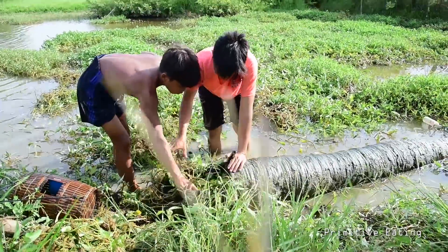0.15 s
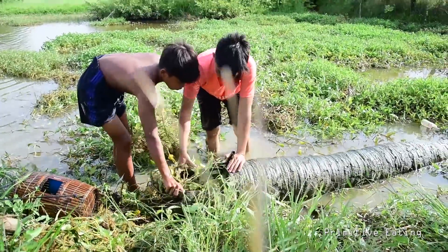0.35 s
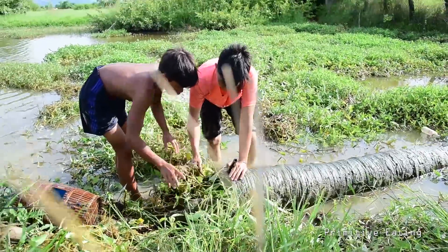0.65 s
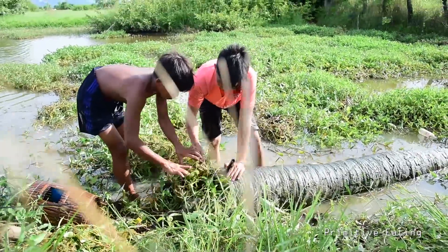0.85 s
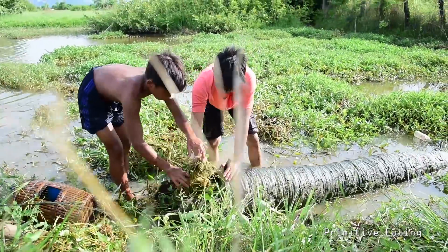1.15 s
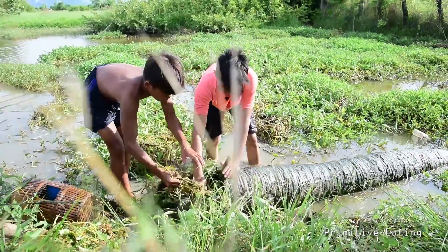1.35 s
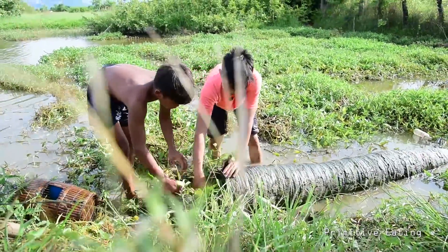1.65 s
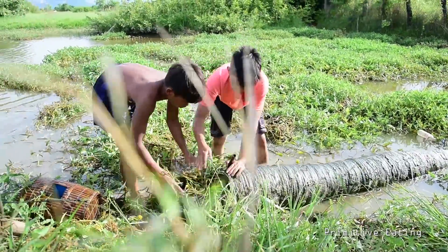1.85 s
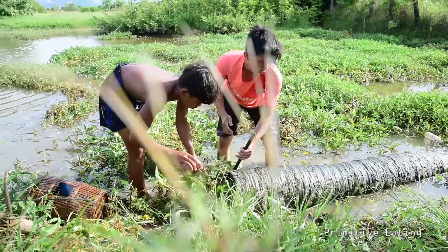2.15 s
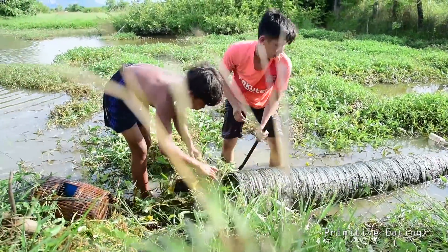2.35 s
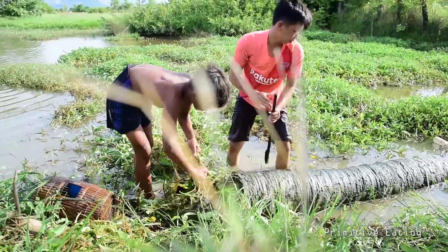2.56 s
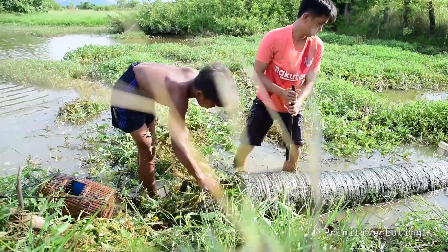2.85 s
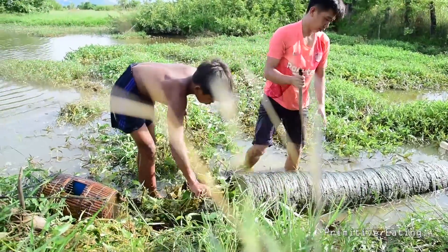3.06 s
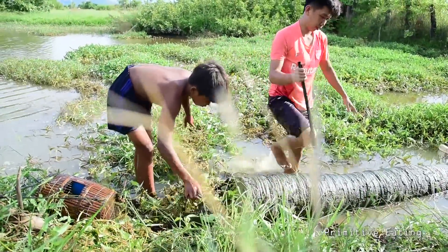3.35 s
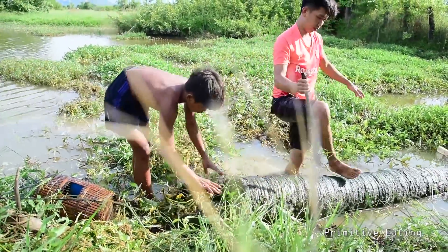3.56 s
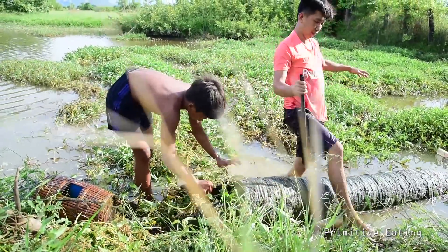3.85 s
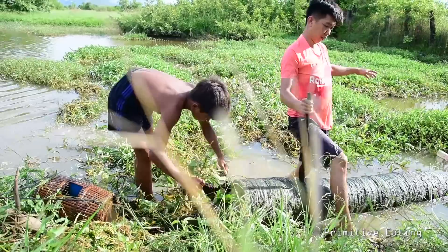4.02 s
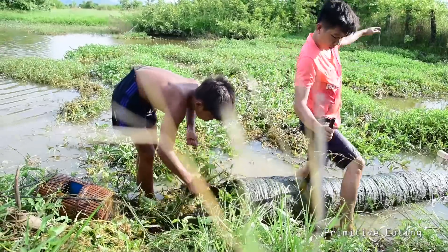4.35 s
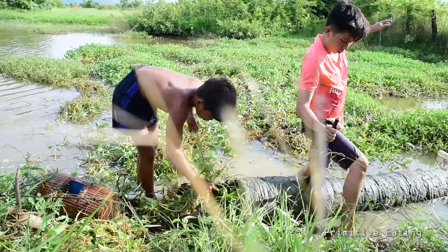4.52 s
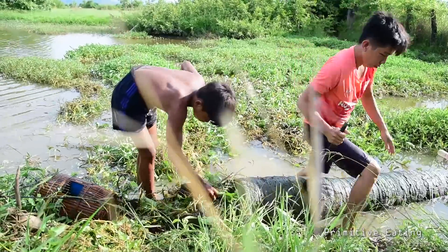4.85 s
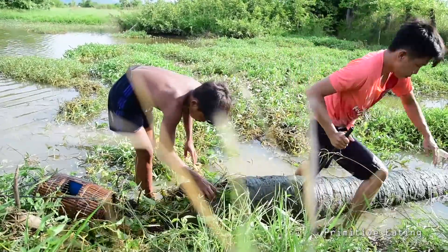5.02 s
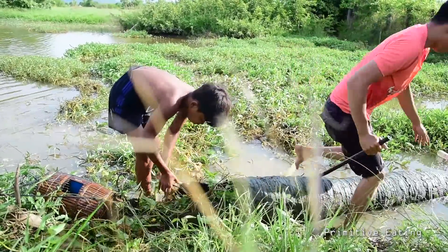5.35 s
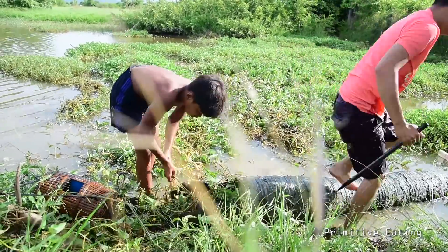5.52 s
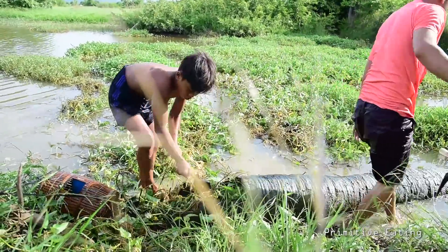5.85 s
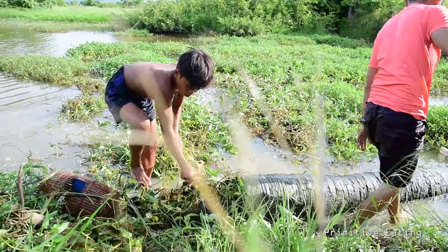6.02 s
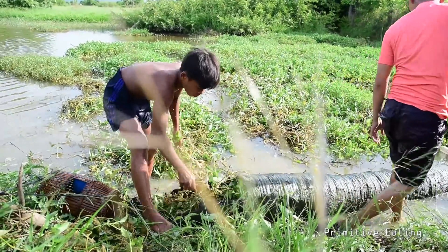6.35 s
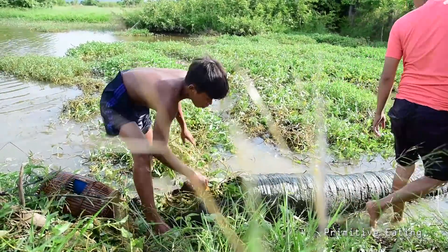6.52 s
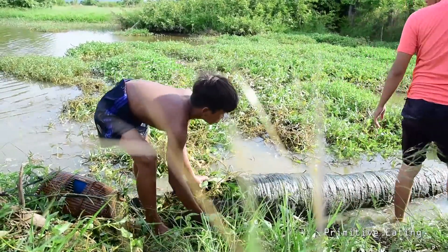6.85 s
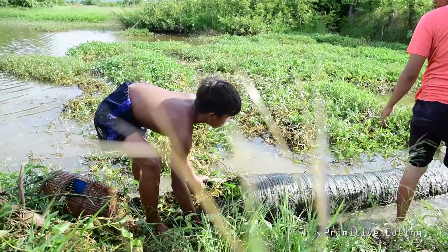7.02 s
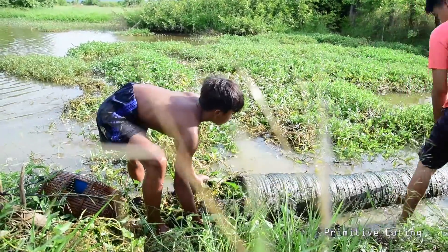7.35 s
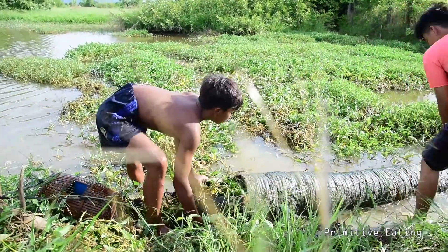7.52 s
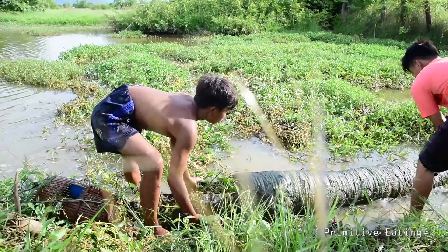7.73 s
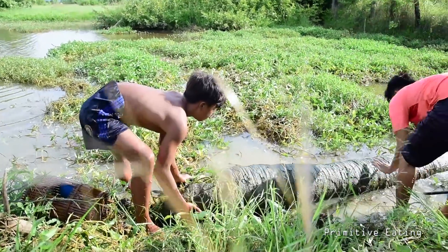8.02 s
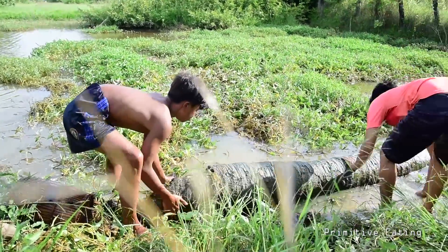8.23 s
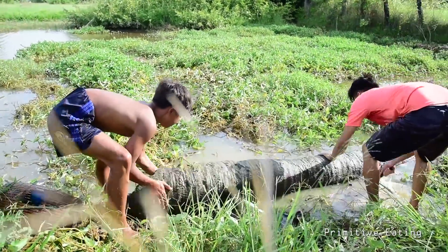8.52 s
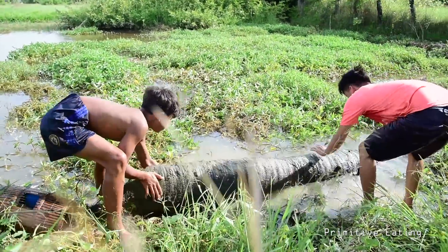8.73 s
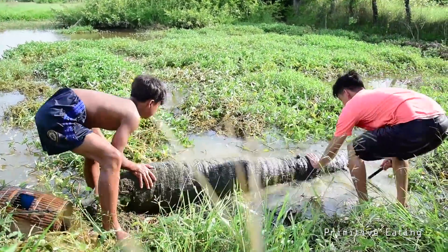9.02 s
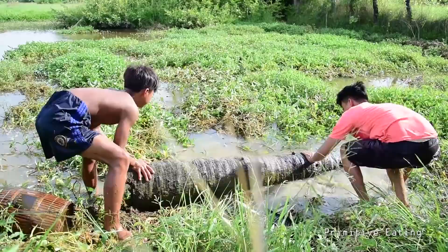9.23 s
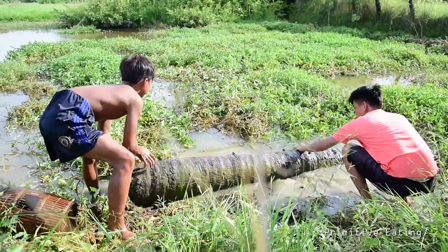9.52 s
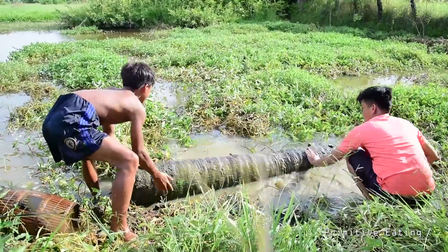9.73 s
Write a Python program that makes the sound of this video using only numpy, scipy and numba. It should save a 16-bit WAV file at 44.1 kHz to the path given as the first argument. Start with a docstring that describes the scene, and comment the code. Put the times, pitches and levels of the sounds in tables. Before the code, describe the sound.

Close outdoor sounds of wet weeds rustling and breaking, hands and legs stirring shallow water, plopping bubbles, then a log dully rumbling and briefly creaking.

```python
"""A shallow muddy pond outdoors: two people clear wet weeds from a log, a few metres from stereo microphones.
Stems snap and tear as shaped noise bursts; bubbles and a knock are damped sines, gulps swelling sines,
squelches upward glides. Slosh and leaf rustle are swarms of small rings; near the end the log rumbles
on the mud and creaks. A low rumble, hiss, drone, insect-like band and thin steady high whine lie underneath."""
import sys
import numpy as np
from scipy import signal
from scipy.fft import rfft, irfft, next_fast_len
from scipy.io import wavfile
from scipy.ndimage import uniform_filter1d, map_coordinates
from numba import njit

SR = 44100
rng = np.random.default_rng(int(sys.argv[2]) if len(sys.argv) > 2 else 0)


def transcribe(u):
    """Save the signal u as a 16-bit wav file named by the first command-line argument.

    u: samples, shape (n,) or (channels, n), limited to [-1, 1]; the rate is SR.
    q: integer samples, one column per channel.
    """
    v = np.clip(np.atleast_2d(u).T, -1, 1)
    q = np.round(v * 32767).astype(np.int16)
    wavfile.write(sys.argv[1], SR, q)


N = 435708
T = np.arange(N) / SR


def undb(db):
    """Decibels to gain."""
    return 10 ** (np.asarray(db) / 20)


def curve(rows):
    """Join (time [s], value) rows by straight lines."""
    return np.interp(T, *np.transpose(rows))


def unit(x):
    """Scale to an rms of 1."""
    return x / np.sqrt(np.mean(x ** 2) + 1e-20)


def band(x, lo_hz, hi_hz, order=2):
    """Causal Butterworth band-pass."""
    edges_hz = [lo_hz, min(hi_hz, SR / 2 - 1)]
    return signal.sosfilt(signal.butter(order, edges_hz, "band", fs=SR, output="sos"), x)


def colour(x, points):
    """Shape a spectrum by (frequency [Hz], gain [dB]) points, joined on a log frequency axis."""
    size = next_fast_len(N)
    hz, db = np.transpose(points)
    bins_hz = np.maximum(np.arange(size // 2 + 1) * SR / size, 1)
    gain = undb(np.interp(np.log(bins_hz), np.log(hz), db))
    return irfft(rfft(x, size) * gain, size)[..., :N]


def walk(rate_hz):
    """Random values, rate_hz new ones per second, joined by straight lines; spread near 1."""
    return np.interp(T * rate_hz, np.arange(N // 20), rng.standard_normal(N // 20))


def pair(size, likeness):
    """Left and right noise that are partly alike."""
    mid, side = rng.standard_normal((2, size))
    c = np.clip(likeness, 0, 1)
    return np.sqrt((1 + c) / 2) * mid + np.sqrt((1 - c) / 2) * np.array([side, -side])


def panned(x, pan_db):
    """Tip a sound left (positive) or right at constant power."""
    return x * unit(undb(np.array([[pan_db], [-pan_db]]) / 2))


def add(out, s, x):
    """Mix x into out from time s."""
    i = max(int(s * SR), 0)
    out[:, i:i + x.shape[-1]] += x[..., :max(N - i, 0)]


def efforts(rows, attack_s, release_s, rest_db=-100):
    """Level in dB of movements (time, length, level): each builds up, holds, dies away; powers add."""
    power = np.full(N, undb(rest_db) ** 2)
    for s, length_s, db in rows:
        t = T[:int((length_s + 8 * release_s) * SR)]
        envelope = np.minimum(t / attack_s, 1) * np.exp(-np.maximum(t - length_s, 0) / release_s)
        add(power[None], s, (undb(db) * envelope) ** 2)
    return 10 * np.log10(power)


@njit
def rings(size, start_s, hz, t60_s, gain, rise):
    """Damped sines whose pitch climbs by the share rise while they die away."""
    out = np.zeros(size)
    for k in range(len(start_s)):
        first, count, phase = int(start_s[k] * SR), int(t60_s[k] * SR) + 2, 0.
        for i in range(max(0, min(count, size - first))):
            phase += 2 * np.pi * hz[k] * (1 + rise * i / count) / SR
            onset = 1 - np.exp(-phase / 3)
            out[first + i] += gain[k] * np.sin(phase) * onset * 1000. ** (-i / count)
    return out


def cloud(count, lo_hz, hi_hz, cycles, spread_db, rise, points, even_s):
    """Swarm of small unequal rings spread left to right, held near a running rms of 1 over even_s."""
    when, pitch, life, size, place = rng.random((count, 5)).T
    hz = lo_hz * (hi_hz / lo_hz) ** pitch
    gain = undb(-spread_db * np.log(np.maximum(size, .004))) * np.sqrt(hz)
    t60_s = cycles * (.5 + life) / hz
    sides = [rings(N, when * N / SR, hz, t60_s, gain * (.5 + p), float(rise)) for p in (place, 1 - place)]
    x = colour(np.array(sides), points)
    power = uniform_filter1d(np.mean(x ** 2, axis=0), int(even_s * SR))
    return x / np.sqrt(np.abs(power) + 1e-12)


# still air over the pond: (frequency [Hz], relative density [dB])
AIR_COLOUR = [(100, -42), (400, -10), (650, -12.5), (1200, -5), (2000, -10), (3000, -9.5), (4400, -13),
              (7500, -10.5), (10500, -12.5), (13000, -16.5), (15000, -20.5)]
# hiss: (time [s], level [dB])
HISS_LEVEL = [(0, -50), (1.9, -55), (4.8, -53), (5.1, -58), (5.6, -54), (9.88, -54)]
WHINE_HZ = 15719


def air(drone_db=-57, ring_db=-66, whine_db=-65, whine_width_hz=5):
    """Wide hiss, a low drone, a faint insect-like band and a thin steady high whine."""
    mid, side = colour(rng.standard_normal((2, N)), AIR_COLOUR)
    # long waves reach both microphones alike
    side = 1.21 * band(side, 910, 18000, order=1)
    hiss = unit(np.array([mid + side, mid - side])) * undb(curve(HISS_LEVEL) + .5 * walk(2.36))
    drone = unit(band(rng.standard_normal(N), 229.6, 274.7)) * undb(drone_db + 2 * walk(13.0))
    ring = unit(band(pair(N, likeness=.9), 3520, 3980)) * undb(ring_db + 2 * walk(40))
    whine = np.sqrt(2) * np.sin(2 * np.pi * np.cumsum(WHINE_HZ + whine_width_hz * walk(30)) / SR)
    return hiss + drone + ring + undb(whine_db) * whine


# breeze on the microphones: (time [s], level [dB])
BREEZE_LEVEL = [(0.0, -44), (1.2, -44.5), (1.7, -47.5), (3.8, -46), (4.35, -44.5), (4.6, -48), (6.9, -46.5),
                (8.1, -44.5), (8.8, -44)]
# its spectrum: (frequency [Hz], relative level [dB])
BREEZE_SPECTRUM = [(20, -28), (32, -8), (42, 4.5), (65, 2), (100, -3), (160, -6), (260, -8.5), (380, -12),
                   (500, -19), (900, -25), (2000, -46)]


def breeze(flutter_db=0.5):
    """Breeze: a fluttering low rumble of coloured noise, the same on both sides."""
    rumble = unit(colour(rng.standard_normal(N), BREEZE_SPECTRUM))
    return rumble * undb(curve(BREEZE_LEVEL) + flutter_db * walk(12))


# one hard, dry knock: (time [s], level [dB], left minus right [dB])
KNOCK_EVENT = (.5892, -7.5, -7)
# its modes: (frequency [Hz], level re knock [dB], t60 [s])
KNOCK_RING = [(584, -28, 0.0085), (900, -7, 0.0043), (1650, 2.5, 0.0035), (2770, 5, 0.0024),
              (3030, -4, 0.0054), (6080, 3, 0.0039), (7700, -1, 0.0016), (9600, -25, .002)]


def knock():
    """A hard blow excites damped modes that die away within a few milliseconds."""
    s, db, pan_db = KNOCK_EVENT
    hz, mode_db, t60_s = np.array(KNOCK_RING, float).T.copy()
    ring = rings(N, np.full(len(hz), s), hz, t60_s, undb(db + mode_db), 0.)
    return panned(ring, pan_db)


# shoves that shift the log on the mud: (time [s], length [s], level [dB])
LOG_SHOVES = [(8.77, 0.21, -46), (8.95, 0.059, -38), (9.39, 0.32, -37.5), (9.49, 0.086, -29.5),
              (9.81, .07, -40)]
SHOVE_ATTACK_S, SHOVE_RELEASE_S = 0.023, 0.019
# creak as the log turns: (time [s], length [s], slips [1/s], pitch [Hz], level [dB])
LOG_CREAK = (9.444, .12, 76, 1750, -49)


def log():
    """The heavy trunk bumps dully over the mud; its bark sticks and slips in a short creak."""
    bumps = cloud(count=2200, lo_hz=55.3, hi_hz=376, cycles=3.2, spread_db=5, rise=0,
                  points=[(30, 3), (80, 4.5), (150, 2.5), (300, -6.5), (500, -24), (1200, -40)],
                  even_s=0.044)
    shove_gain = undb(efforts(LOG_SHOVES, SHOVE_ATTACK_S, SHOVE_RELEASE_S))
    out = unit(bumps.mean(axis=0)) * shove_gain * np.ones((2, 1))
    s, length_s, slips_hz, hz, db = LOG_CREAK
    t = T[:int(length_s * SR)]
    slip_envelope = np.exp(-(t * slips_hz % 1) / 0.39 - 2 * t / length_s)
    slips = slip_envelope * pair(t.size, likeness=0.6)
    add(out, s, undb(db) * unit(band(slips, hz / 1.4, hz * 1.21)))
    return out


# air pockets closing behind a hand or foot: (time [s], pitch [Hz], relative level [dB])
GULP_EVENTS = [(0.085, 246, -31), (0.131, 263, -30.5), (0.172, 265, -33), (0.582, 235, -33.5),
               (2.42, 257, -36), (3.009, 262, -28), (3.05, 258, -30), (4.179, 271, -31.5),
               (4.737, 272, -39), (4.77, 286, -36), (4.795, 272, -32), (6.21, 278, -31),
               (7.031, 246, -25.5), (7.064, 318, -34), (8.017, 220, -30), (8.055, 235, -32),
               (8.11, 285, -30.5), (8.419, 253, -33)]
GULP_SWELL_S = 0.0074


def gulps(level_db=-1, stir_db=-11, stir_s=0.018):
    """A hollow in the water closes and throbs for a few deep cycles, while the water around it heaves."""
    out, t, stir = np.zeros((2, N)), T[:SR // 8], np.zeros(N)
    swell = (t / GULP_SWELL_S * np.exp(1 - t / GULP_SWELL_S)) ** 1.44
    for s, hz, db in GULP_EVENTS:
        add(out, s, undb(db + level_db) * swell * np.sin(2 * np.pi * hz * t))
        stir = np.maximum(stir, undb(db) * np.exp(-np.abs(T - s) / stir_s))
    heave = unit(band(rng.standard_normal(N), 173, 356))
    return out + undb(stir_db) * stir * heave


# mud sucking at a narrowing air hole:
# (time [s], length [s], first pitch [Hz], last pitch [Hz], level before flutter [dB])
SQUELCH_EVENTS = [(0.977, 0.031, 817, 2000, -46), (1.532, 0.029, 780, 1040, -48),
                  (1.562, 0.023, 710, 880, -37), (1.584, 0.033, 957, 1460, -37.5),
                  (2.231, 0.024, 1300, 2090, -48.5), (5.513, 0.037, 786, 1407, -39),
                  (6.022, 0.04, 1138, 2260, -43), (9.273, 0.065, 453, 1074, -47.5)]


def squelches(rough_db=3, wobble=0.042, flutter_hz=260):
    """An air hole in the mud shrinks, so its note slides up; the soft rim flutters and breaks the note."""
    out = np.zeros((2, N))
    for s, length_s, first_hz, last_hz, db in SQUELCH_EVENTS:
        u = np.linspace(0, 1, int(length_s * SR))
        knots = rng.standard_normal((2, SR // 1000))
        size, pitch = (np.interp(u * length_s * flutter_hz, np.arange(row.size), row) for row in knots)
        hz = first_hz * (last_hz / first_hz) ** u * np.exp(wobble * pitch)
        phase = 2 * np.pi * np.cumsum(hz) / SR
        envelope = undb(db + rough_db * size) * np.abs(np.sin(np.pi * u)) ** 0.3
        add(out, s, envelope * np.sin(phase))
    return out


# single loud bubbles: (time [s], starting pitch [Hz], relative level [dB])
BUBBLE_EVENTS = [(0.505, 2690, -40), (1.158, 1440, -38.5), (1.399, 3820, -35), (1.428, 3390, -31),
                 (2.952, 2250, -39.5), (3.28, 1291, -36), (3.302, 1030, -34), (3.348, 1500, -27),
                 (3.361, 900, -21), (3.364, 1190, -18), (3.406, 1210, -31), (3.445, 1270, -36),
                 (3.489, 2610, -32), (3.528, 2400, -31), (3.873, 1960, -31.5), (4.037, 1370, -36),
                 (4.177, 1050, -27.5), (4.187, 530, -29), (4.687, 1136, -19), (5.311, 1650, -39.5),
                 (5.37, 1291, -30.5), (5.427, 2000, -35), (5.475, 970, -36), (5.616, 1900, -39),
                 (5.658, 2130, -37.5), (5.886, 1200, -33.5), (5.91, 1254, -24.5), (5.973, 1930, -29.5),
                 (6.119, 2190, -34), (6.153, 1240, -25), (6.534, 1808, -35), (6.636, 1420, -24),
                 (6.643, 2250, -24.5), (6.669, 2300, -24), (6.703, 1710, -31), (6.755, 1370, -23.5),
                 (7.039, 955, -27.5), (7.074, 720, -31.5), (7.684, 930, -33.5), (7.8, 1165, -29),
                 (7.995, 1070, -26), (8.001, 557, -32), (8.02, 544, -33), (8.048, 1010, -33),
                 (8.118, 1270, -39), (8.319, 1200, -37.5), (8.412, 1050, -36), (8.421, 2550, -33.5),
                 (8.483, 1033, -38.5), (8.565, 1110, -38.5), (8.706, 1910, -35.5), (8.834, 1130, -39.5),
                 (9.332, 1690, -36), (9.753, 550, -39), (9.831, 900, -36)]
BUBBLE_T60_S = 0.028


def bubbles(rise=0.18, level_db=3, split_db=-11, split_s=.007, spread=0.195, pan_db=-1.5, count=3):
    """A pocket of air breaks into one large ringing bubble and a few lesser ones of nearby pitch."""
    s, hz, db = np.array(BUBBLE_EVENTS, float).T.copy()
    t60_s = np.full(len(s), BUBBLE_T60_S)
    out = rings(N, s, hz, t60_s, undb(db + level_db), float(rise))
    for _ in range(count):
        delay, pitch, size = rng.standard_normal((len(s), 3)).T
        lesser_s = s + split_s * np.abs(delay)
        lesser_hz = hz * np.exp(spread * pitch)
        out += rings(N, lesser_s, lesser_hz, 0.53 * t60_s, undb(db + split_db + 2 * size), float(rise))
    return panned(out, pan_db)


# a leg or hand sweeps through the water: (time [s], length [s], relative level [dB])
WATER_STROKES = [(0.0, 0.13, -50), (0.48, .12, -56), (0.96, 0.051, -51), (1.11, 0.08, -52.5),
                 (1.36, .27, -59), (2.05, 0.019, -55), (2.76, 0.064, -45), (2.96, 0.14, -50.5),
                 (3.27, .28, -44.5), (3.32, 0.14, -44.5), (3.38, 0.079, -55), (3.58, .2, -55.5),
                 (3.87, 0.21, -53), (4.45, 0.038, -56.5), (4.68, .11, -54), (5.28, 0.024, -50.5),
                 (5.33, 0.2, -45.5), (5.56, 0.076, -49.5), (5.85, 0.13, -43.5), (6.09, 0.14, -50),
                 (6.51, 0.28, -46), (6.6, 0.084, -43), (6.95, 0.25, -51.5), (7.01, 0.021, -38),
                 (7.3, 0.04, -53), (7.4, 0.068, -56), (7.66, 0.18, -53), (7.97, 0.13, -44),
                 (8.18, 0.21, -49.5), (8.39, 0.21, -47), (8.66, .14, -47), (8.82, 0.33, -56.5),
                 (9.14, 0.25, -50.5), (9.62, 0.19, -49), (9.78, 0.11, -45)]
# spectrum of the stirred water: (frequency [Hz], gain [dB])
WATER_COLOUR = [(200, -31), (450, 2), (700, -2), (1150, 4), (1800, 5.5), (2800, 9.5), (4500, 7.5),
                (9000, 28)]
# the water takes a moment to get going, then settles to a gentle lapping
STROKE_ATTACK_S, STROKE_RELEASE_S, LAPPING_REST_DB = 0.017, 0.048, -61.5


def slosh(bubble_db=-4, churn_db=-4.0, gurgle_db=-47, lapping_db=2, surge_db=1.35, pan_db=-1.5,
          gush_db=-7, gush_growth=1.5):
    """Stirred water: little bubbles over a churn of shorter ones; a gush grows faster than the strokes."""
    distinct = cloud(count=3200, lo_hz=750, hi_hz=3200, cycles=32, spread_db=4.2, rise=.24,
                     points=WATER_COLOUR, even_s=.07)
    churn = cloud(count=18000, lo_hz=450, hi_hz=5000, cycles=15, spread_db=3, rise=.18,
                  points=WATER_COLOUR, even_s=.06)
    gush = cloud(count=2600, lo_hz=850, hi_hz=1900, cycles=40, spread_db=3, rise=.2,
                 points=WATER_COLOUR, even_s=.05)
    db = efforts(WATER_STROKES, STROKE_ATTACK_S, STROKE_RELEASE_S, LAPPING_REST_DB)
    db = db + surge_db * walk(22) + lapping_db * walk(110)
    # gentle stirring traps little air, hard stirring shreds it: single bubbles stand out in between
    blend_db = np.minimum(np.abs(db - gurgle_db) / 4, 3) - 0.5
    water = undb(db + bubble_db - blend_db) * distinct + undb(db + churn_db + blend_db / 2) * churn
    gush_gain = undb(gurgle_db + gush_db + gush_growth * (db - gurgle_db))
    return panned(water + gush_gain * gush, pan_db)


# wet weeds dragged or brushed aside: (time [s], length [s], relative level [dB], left minus right [dB])
WEED_PULLS = [(0.0, 0.12, -41, 5.5), (0.255, 0.34, -59, 10), (0.612, 0.24, -52.5, 4), (0.91, 0.56, -53, 5),
              (1.497, 1, -68, 8), (2.495, 0.18, -48.5, 3.5), (2.754, 0.053, -35, 5), (2.972, .11, -45.5, 5),
              (3.296, 0.37, -43, 2.5), (3.986, 0.037, -54, -4), (4.173, 0.17, -52, 6),
              (4.458, 0.02, -45, 5), (4.678, 0.033, -44.5, 1), (4.724, 0.18, -59.5, 3),
              (5.325, 0.35, -52.5, 7), (5.73, 0.091, -45, 0), (5.908, 0.089, -38.5, 4),
              (6.137, 0.048, -42.5, 6), (6.228, 0.11, -52, 5), (6.405, 0.45, -48, 1), (6.568, .17, -46, 2),
              (6.852, 0.049, -37.5, -2.5), (6.986, 0.087, -41.5, -4), (7.125, 0.065, -45.5, -2),
              (7.252, 0.077, -54.5, -6), (7.512, 0.15, -52.5, -2), (7.711, 0.024, -49, -4),
              (7.962, 0.27, -51, -6), (8.172, 0.16, -47, -1), (8.372, 0.42, -47.5, -1),
              (8.786, 0.58, -57, 0), (9.617, 0.36, -48, 3)]
# spectrum of the leaves: (frequency [Hz], gain [dB])
LEAF_SPECTRUM = [(500, -34), (1500, 0.5), (3000, 0), (4200, 2.5), (5100, 3), (6300, -0.5), (8500, 2),
                 (10500, 4), (13000, -2), (16000, -11)]
# the leaves spring back and keep dripping faintly
PULL_ATTACK_S, PULL_RELEASE_S, DRIPPING_DB = 0.018, 0.044, -63


def rustle(tick_db=-3, brush_db=-4, ragged_db=3, tug_db=2.5):
    """Wet leaves tick and droplets land, over the finer, ragged brushing of blades."""
    ticks = cloud(count=3200, lo_hz=3500, hi_hz=14000, cycles=11, spread_db=4.6, rise=.05,
                  points=LEAF_SPECTRUM, even_s=.1)
    # each tick sets its leaf shivering for a moment
    t = T[:SR // 100]
    shiver = unit(rng.standard_normal(t.size) * np.exp(-t / 0.0036)) / np.sqrt(t.size)
    ticks = signal.fftconvolve(ticks, 0.64 * (shiver + (t == 0))[None], axes=1)[:, :N]
    brush = cloud(count=50000, lo_hz=2000, hi_hz=13500, cycles=8.0, spread_db=-1.5, rise=0,
                  points=LEAF_SPECTRUM, even_s=0.042)
    pull_db = []
    for side in (1, -1):
        rows = [(s, length_s, db + side * pan_db / 2) for s, length_s, db, pan_db in WEED_PULLS]
        pull_db.append(efforts(rows, PULL_ATTACK_S, PULL_RELEASE_S, DRIPPING_DB))
    pull_db = np.array(pull_db) + tug_db * walk(25)
    leaves = undb(tick_db) * ticks + undb(brush_db + ragged_db * walk(220)) * brush
    return leaves * undb(pull_db)


# low, middle and treble bands of snaps and tears: (from [Hz], to [Hz])
BURST_BANDS = [(850, 2420), (2000, 3620), (4200, 10300)]


def burst(envelope, length_s, band_db, pan_db, likeness):
    """Noise under an envelope; each band's energy is that of its level held for length_s."""
    noise = pair(len(envelope), likeness) * envelope
    parts = [band(noise, lo_hz, hi_hz, order=2) for lo_hz, hi_hz in BURST_BANDS]
    mix = sum(undb(db) * unit(part) for db, part in zip(band_db, parts))
    return panned(mix, pan_db) * np.sqrt(length_s * SR / len(envelope))


# weeds tearing and water thrown up:
# (time [s], length [s], low [dB], middle [dB], treble [dB], left minus right [dB])
WEED_TEARS = [(0.005, 0.019, -58, -46, -42.5, 2), (0.109, 0.07, -48, -47, -41, 3),
              (1.361, 0.028, -62, -47, -46.5, 3), (2.788, 0.071, -59, -56, -39, 2),
              (3.337, 0.024, -36, -61, -57, -3), (3.659, 0.022, -55.0, -44, -34.5, 1),
              (3.896, 0.028, -43, -40.5, -33, 0), (4.016, 0.014, -46, -59, -40, 2),
              (4.169, 0.015, -60, -39, -31.5, -3), (4.508, 0.018, -50, -44.5, -40.5, 2),
              (5.765, 0.059, -55.0, -38.5, -32.5, -3), (5.912, 0.047, -52, -32.5, -59, -14),
              (6.621, 0.016, -33, -58, -40, 1), (6.744, 0.012, -43, -44, -40.5, -21),
              (6.859, 0.049, -44.5, -40.5, -36, 5), (7.036, 0.049, -41.5, -42, -39, -3),
              (7.99, 0.02, -36.5, -38.5, -37.5, -5), (8.043, 0.017, -53, -44, -62, -5),
              (9.228, 0.034, -63, -49, -36.5, -3), (9.834, 0.023, -46, -64, -48, -10)]


def tears(fibres_db=4.0, fibre_s=0.001584, tail_s=0.0078):
    """Many fibres give way one after another, so the burst is ragged."""
    out, t = np.zeros((2, N)), T[:SR // 5]
    for s, length_s, *band_db, pan_db in WEED_TEARS:
        fibres = np.interp(t / fibre_s, np.arange(t.size), rng.standard_normal(t.size))
        attack = np.minimum(t / (0.21 * length_s), 1)
        tail = np.exp(-np.maximum(t - 0.63 * length_s, 0) / tail_s)
        envelope = attack * tail * undb(fibres_db * fibres)
        add(out, s, burst(envelope, length_s, band_db, pan_db, likeness=0.37))
    return out


# stems snapping and water slapping:
# (time [s], length [s], low [dB], middle [dB], treble [dB], left minus right [dB])
STEM_SNAPS = [(0.138, .0068, -50, -41, -32.5, 6), (0.644, 0.0072, -53, -60, -43, -7),
              (0.714, 0.0054, -62, -58, -38, 1), (1.055, .004, -62, -50, -46, 2),
              (1.205, 0.007, -59, -51, -42.5, 5), (1.386, 0.0043, -41, -37, -52, 1),
              (1.4282, .0043, -59, -57, -43, 3), (1.653, .0023, -61, -54, -43.5, 6),
              (1.887, 0.002, -60, -50, -36, -25), (2.493, .005, -51, -43, -59, 0),
              (2.7625, 0.0045, -32.5, -21, -21.5, -2), (2.783, 0.0037, -24, -21.5, -15.5, 2),
              (2.797, 0.0073, -54, -41, -30, 0), (2.816, 0.0046, -55, -34, -44, -6),
              (3.172, 0.0029, -39, -36.5, -32.5, 1), (3.285, 0.0033, -50, -61, -33.5, 0),
              (3.351, 0.002, -32, -46, -47, -4), (3.634, 0.0065, -46, -36.5, -38, -2),
              (3.891, .004, -52, -46, -31, -2), (3.91, .0025, -42, -42, -26, 0),
              (4.034, 0.0026, -42, -44, -41, 0), (4.0735, .0025, -38, -47, -40, 0),
              (4.175, 0.0095, -27.5, -23.5, -30.5, 0), (4.247, 0.0037, -58, -48, -46, -1),
              (4.6868, 0.0052, -30, -28.5, -23.5, 1), (4.766, 0.018, -47.5, -46.5, -42.5, 3),
              (4.8446, .007, -57, -55, -46.5, 4), (5.3974, 0.0034, -43, -39, -26.5, 1),
              (5.427, 0.0024, -41, -41, -30, -1), (5.5065, 0.0048, -34.5, -34.5, -59, -9),
              (5.925, .0048, -36, -27.5, -27, 13), (5.9343, 0.0073, -52, -48, -27.5, -19),
              (6.155, 0.0071, -30.5, -21, -20, 1), (6.319, 0.0075, -47, -50, -40.5, 0),
              (6.434, .0026, -46, -46, -38, 2), (6.483, 0.0025, -50, -44, -33, 13),
              (6.631, 0.004, -34, -50, -36, -6), (6.6685, 0.0038, -53, -36, -42, -2),
              (6.8803, 0.0038, -31, -23, -18, -10.5), (6.909, .003, -56, -47, -33, -8),
              (7.037, 0.0091, -29, -29.5, -31.5, -4), (7.229, 0.0029, -56, -39, -35.5, -4),
              (7.752, .003, -60, -52, -39, 0), (7.86, 0.0037, -67, -51, -41.5, -3),
              (8.118, .005, -52, -46, -41, -3), (8.1727, 0.0021, -48, -48, -34, 4),
              (8.205, 0.0028, -40, -39, -30.5, -14), (8.281, 0.0088, -49, -40, -37.5, -10),
              (9.218, 0.0082, -51, -41, -31.5, -3), (9.2446, 0.0064, -56, -34, -30, -8)]


def snaps(spray_db=-23, spray_s=.022):
    """Each stem breaks with a crack, splinters for some milliseconds and flicks off a little spray."""
    out, t = np.zeros((2, N)), T[:SR // 6]
    crack = 2.1 * np.exp(-t / .0003)
    for s, length_s, *band_db, pan_db in STEM_SNAPS:
        splinters = np.exp(-(t / length_s) ** 2.2)
        # longer breaks throw more spray
        spray = undb(spray_db) * np.exp(-t / spray_s) * min(length_s / 0.025, 1) ** 2
        add(out, s, burst(crack + splinters + spray, length_s, band_db, pan_db, likeness=0.73))
    return out


def bank(x, near_db=-11, near_s=0.0059, far_db=-25, far_s=0.28):
    """Grass and water scatter the treble at once; the reeds further off return a faint tail."""
    t = T[:SR // 3]

    def tail(decay_s):
        """Decaying noise of unit energy per side."""
        noise = pair(t.size, likeness=0.051) * np.exp(-t / decay_s) * (t > .0005)
        return unit(noise) / np.sqrt(t.size)

    scatter = band(undb(near_db) * tail(near_s) + undb(far_db) * tail(far_s), 590, 9400, order=2)
    return x + signal.fftconvolve(x, scatter, axes=1)[:, :N]


# where the work is: (time [s], lag of the left microphone [ms])
WORK_BEARING = [(0, -0.022), (.4, 0.0046), (.6, .11), (.9, -0.015), (2.8, -0.023), (3.2, 0.024),
                (3.6, 0.075), (4.3, 0.096), (4.6, -0.054), (5.2, 0.071), (5.9, 0.15), (6.15, -0.031),
                (6.5, .13), (9.88, .12)]


def scene():
    """The work in the weeds reaches the nearer microphone first; the deep sounds reach both alike."""
    left, right = knock() + squelches() + bubbles() + slosh() + rustle() + tears() + snaps()
    late = np.arange(N) - curve(WORK_BEARING) * SR / 1000
    left = map_coordinates(left, [late], order=3)
    return air() + breeze() + bank(np.array([left, right]) + log() + gulps())


TOP_HZ = 16000


def record(dry):
    """The microphones' electronics cut the deepest bass and the top."""
    dry = signal.sosfilt(signal.butter(2, 32, "high", fs=SR, output="sos"), dry)
    return signal.sosfilt(signal.ellip(8, .2, 70, TOP_HZ, fs=SR, output="sos"), dry)


dry = scene()
out = record(dry)
transcribe(out)
```